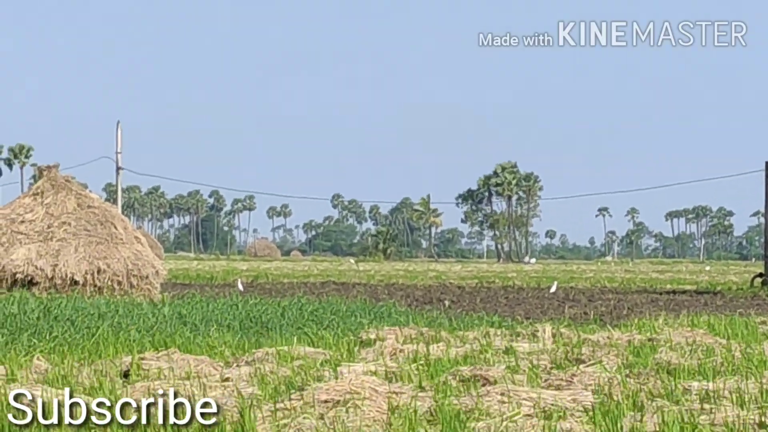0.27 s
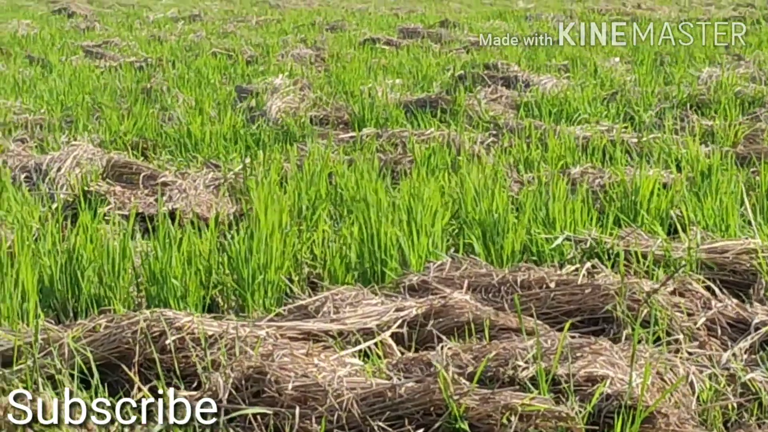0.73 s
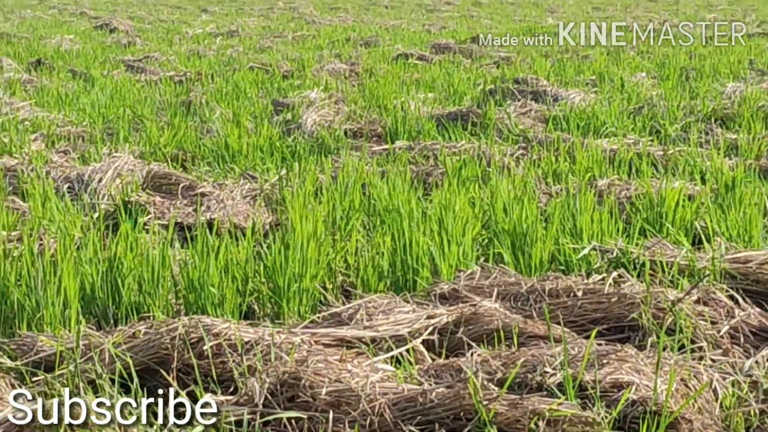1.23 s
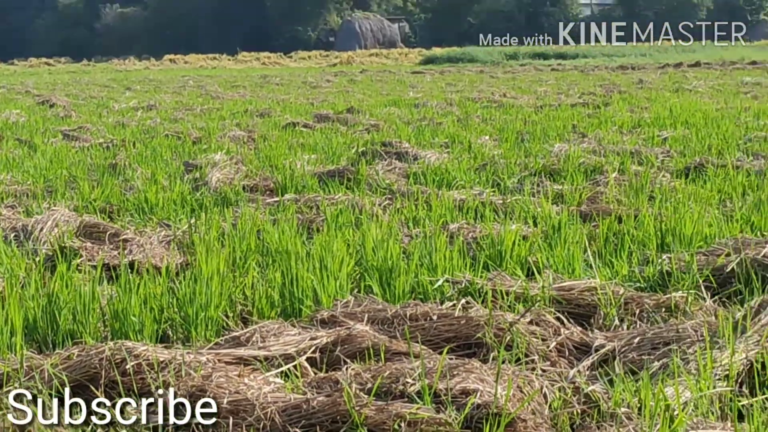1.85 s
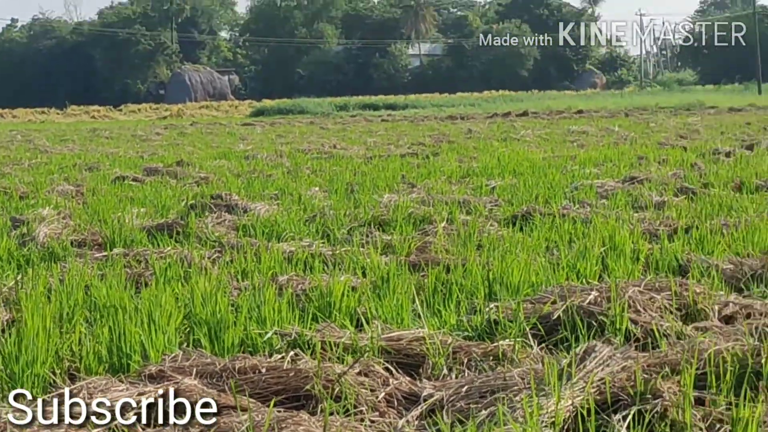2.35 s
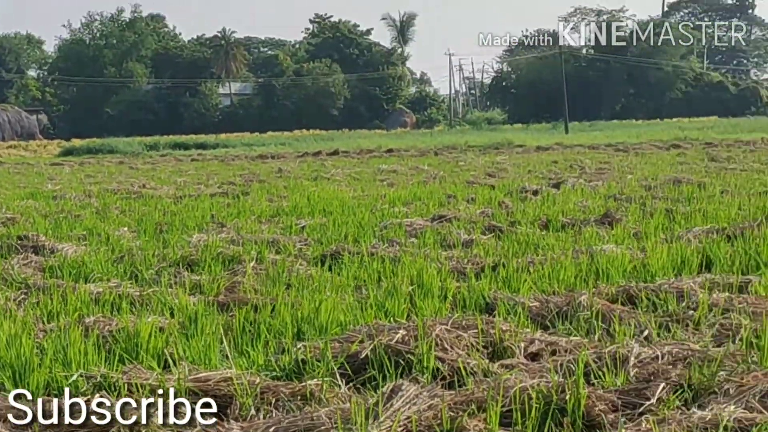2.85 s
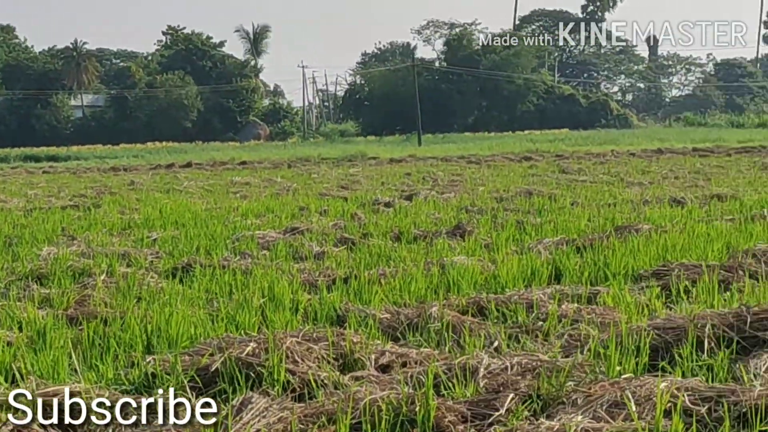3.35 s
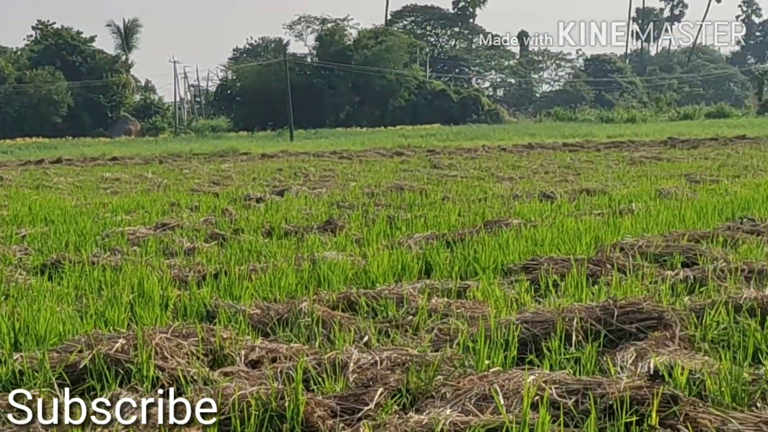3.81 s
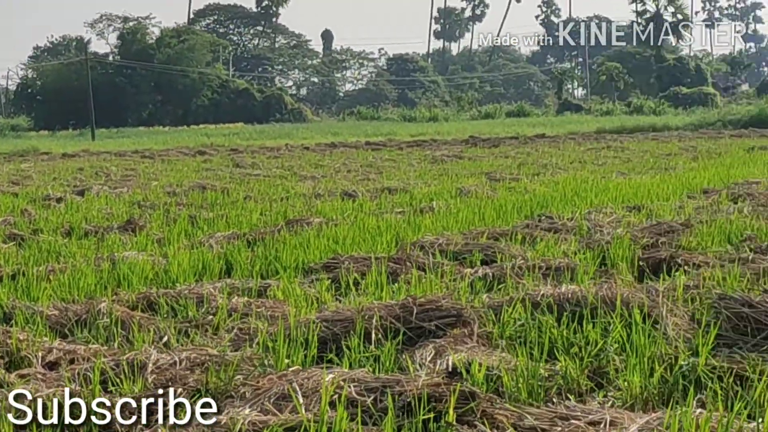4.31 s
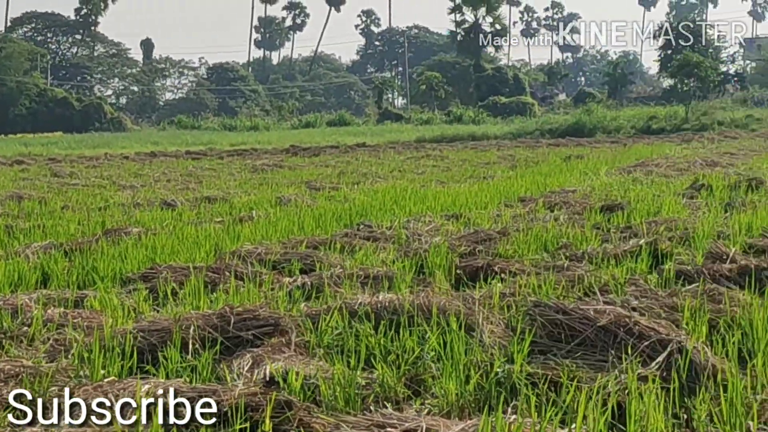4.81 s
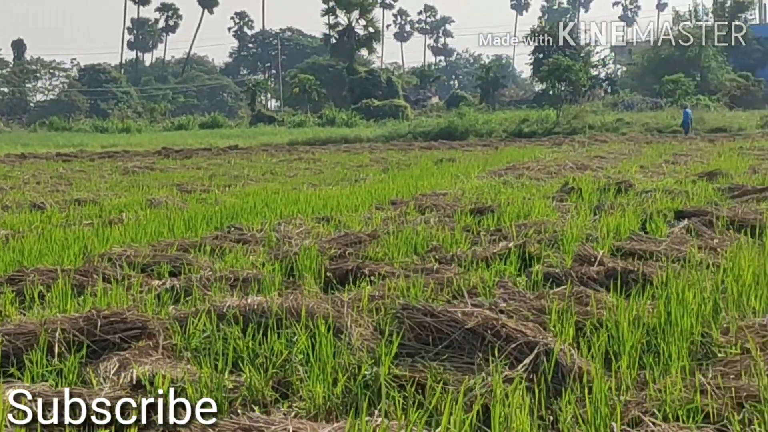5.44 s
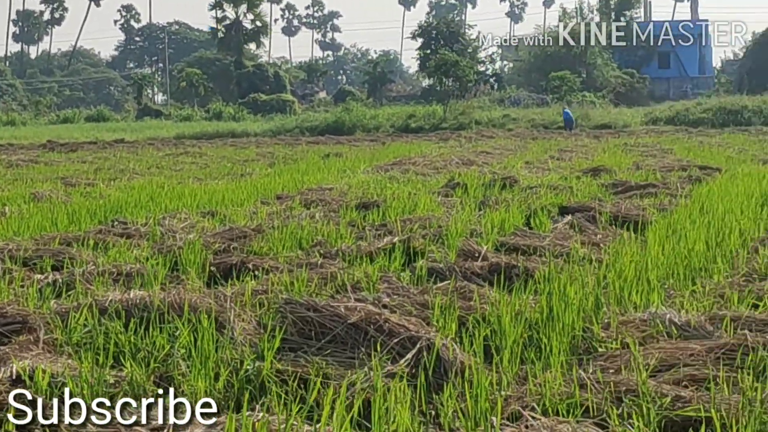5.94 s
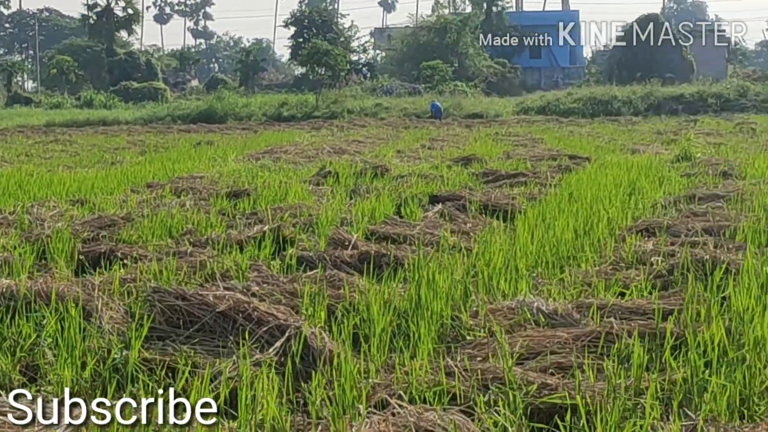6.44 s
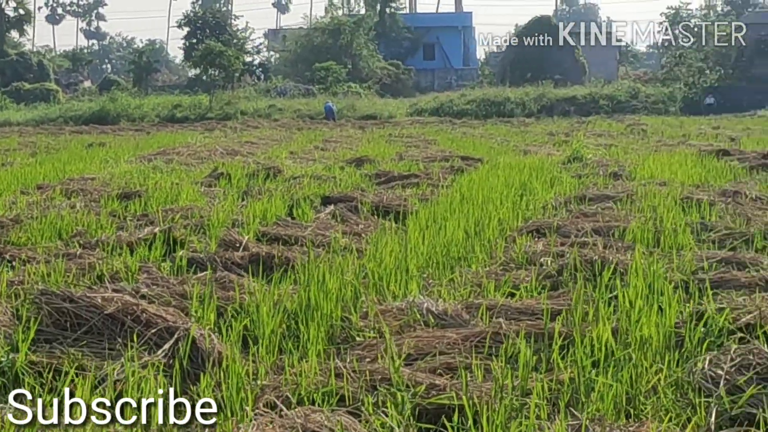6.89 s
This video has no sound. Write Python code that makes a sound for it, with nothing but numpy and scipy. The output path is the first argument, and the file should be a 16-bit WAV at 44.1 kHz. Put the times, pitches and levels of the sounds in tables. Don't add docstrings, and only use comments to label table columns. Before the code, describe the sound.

Quiet farmland outdoors: far crows and clucking hens, then raspy close caws beneath one rooster crow, followed by soft doves, chirps and a faint engine.

```python
import sys
import numpy as np
from scipy import signal
from scipy.fft import rfft, irfft, next_fast_len
from scipy.io import wavfile
from scipy.ndimage import uniform_filter1d, map_coordinates

SR = 44100
rng = np.random.default_rng(int(sys.argv[2]) if len(sys.argv) > 2 else 0)


def makeup_ratio(level_db):
    decades = np.asarray(level_db, float) / 20
    return 10 ** decades


def int16_out(signal):
    q = np.round(np.clip(np.atleast_2d(signal).T, -1, 1) * 32767)
    wavfile.write(sys.argv[1], SR, q.astype(np.int16))


N = 315756


def unit(x):
    return x / np.sqrt(np.mean(x ** 2) + 1e-20)


def along(points, hz):
    f, v = np.transpose(points)
    return np.interp(np.log(hz + 1), np.log(f + 1), v)


def sampled(rows):
    s, *cols = np.transpose(rows)
    t = np.arange(max(s[0], 0), s[-1], 1 / SR)
    return [t] + [np.interp(t, s, c) for c in cols]


def wobble(size, rate):
    knots = rng.standard_normal(int(size * rate / SR) + 4)
    return map_coordinates(knots, [np.arange(size) * rate / SR])


def panned(pan_db):
    return makeup_ratio(np.array([[pan_db], [-pan_db]]) / 2)


def add(out, s, x, pan_db, fade=0.0016):
    i = np.arange(len(x))
    x = x * np.sin(np.pi / 2 * np.clip(np.minimum(i, i[::-1]) / (fade * SR), 0, 1)) ** 2
    room = out[:, round(s * SR):][:, :len(x)]
    room += panned(pan_db) * x[:room.shape[1]]


def coloured(x, spectrum):
    m = next_fast_len(x.shape[-1] + 4096)
    gain = makeup_ratio(along(spectrum, np.fft.rfftfreq(m, 1 / SR)))
    return irfft(rfft(x, m) * gain, m)[..., :x.shape[-1]]


def rooster():
    # t/s, f/Hz, level/dB, beak closure/dB, third partial/dB
    syllables = [
        [(2.9, 743, -51, 7, -15), (2.925, 793, -32.5, -11, -24), (2.968, 789, -33.5, -6, -29),
         (2.985, 780, -63, -7, -23), (3.03, 802, -50, 3, 2)],
        [(3.1, 794, -41.5, 3, -11), (3.16, 818, -43, -6, -25), (3.19, 833, -35.5, -7, -29),
         (3.23, 782, -42.5, -10, -17), (3.33, 738, -42.5, 0, -13)],
        [(3.355, 755.5, -69, -20, -20), (3.38, 769.4, -36.5, -21, -21), (3.51, 767, -41.5, -12.5, -23),
         (3.61, 784.7, -38, -16.5, -28), (3.7, 732.6, -36, -25, -26), (3.74, 723, -43.5, -10, -6),
         (3.79, 734, -40.5, -13, -31), (3.86, 677, -39.5, -5, -26), (3.94, 725, -61, -13, -9)],
        [(3.955, 740, -46, -10, -7), (3.975, 745, -45, -37, -23), (4.1, 740, -42.5, -19, -16),
         (4.17, 732, -43, -11, -16), (4.19, 750, -84, 12, 11)],
        [(4.2, 738, -72, 21, 13), (4.235, 730, -54, 1.5, 0), (4.27, 720.5, -43, -8, -3.5),
         (4.31, 715, -49.5, -8, -10), (4.345, 680, -53.5, 12.5, 0), (4.37, 540, -56, 3, -3),
         (4.4, 588, -64, 17.5, -8)],
    ]
    # t/s, hoarseness (0-1)
    hoarseness = [(2.9, .08), (3.05, .1), (3.12, .45), (3.33, .45), (3.4, .08), (3.6, .1), (3.65, .5),
                  (3.82, .35), (3.95, .03), (4.4, .06)]
    out = np.zeros((2, N))
    for syllable in syllables:
        t, hz, db, closure_db, third_db = sampled(syllable)
        hoarse = np.interp(t, *np.transpose(hoarseness))
        turns = np.cumsum(hz * (1 + 0.062 * hoarse * wobble(len(t), 124.3))) / SR
        voice = np.zeros(len(t))
        for k, share_db in enumerate((closure_db, 0, third_db), start=1):
            voice += makeup_ratio(db + share_db + 1.5) * np.sin(2 * np.pi * k * turns)
        shake = makeup_ratio(7.0 * hoarse * wobble(len(t), 63.6))
        add(out, t[0], voice * shake, pan_db=-1.0)
    return out


def flapping(size, rattle, rattle_hz, uneven):
    flap = np.cumsum(rattle_hz * (1 + uneven * wobble(size, 68.3))) / SR
    chop = np.exp(0.76 * rattle * (np.cos(2 * np.pi * flap) + uneven * wobble(size, 263.3)))
    return chop / np.sqrt(np.abs(uniform_filter1d(chop ** 2, size=1500)))


def overtones(pitch_hz, throat, jitter, count=6):
    turns = np.cumsum(pitch_hz * (1 + jitter * wobble(len(pitch_hz), 151.8))) / SR
    k = np.arange(1, count + 1)[:, None]
    return (makeup_ratio(along(throat, k * pitch_hz)) * np.sin(2 * np.pi * k * turns)).sum(0)


def rasp(size, throat, rattle_hz):
    puffs = rng.standard_normal(size) * flapping(size, 0.52, rattle_hz, 0.327)
    return unit(coloured(puffs, throat))


def near_crow():
    # t/s, length/s, top f/Hz, tone level/dB
    caws = [
        (2.567, 0.18, 670, -43),
        (2.886, 0.18, 639, -44.5),
        (3.066, 0.37, 654.4, -44.5),
        (3.605, 0.3, 615, -50),
        (3.918, 0.06, 684, -47),
    ]
    breath_db = [-42.5, -41, -40, -43.5, -41]
    slack_hz = [534.5, 590, 589.5, 602.4, 590]
    # f/Hz, level/dB
    tone_throat = [(450, -14), (640, 2), (1000, -2), (1140, 3), (1230, -14), (1700, -16), (2000, -26),
                   (9000, -62)]
    # f/Hz, level/dB
    breath_throat = [(480, -38), (650, 2.5), (880, -7.5), (1050, -1), (1200, -8.5), (1330, 4), (1500, 5.5),
                     (1850, -7.5), (2650, -19.5), (2900, -23.5), (5200, -24), (6200, -17), (7200, -36),
                     (9500, -59)]
    rise_s, fall_s = 0.0596, 0.061
    slack_rattle, tense_rattle = 0.26, 0.62
    break_db, rasp_grows_db = 2, 27
    out = np.zeros((2, N))
    for (s, length, hz, tone_db), rasp_db, rest_hz in zip(caws, breath_db, slack_hz):
        t = np.arange(round(length * SR)) / SR
        effort = np.clip(np.minimum(t / rise_s, (length - t) / fall_s), 0, 1)
        rattle = slack_rattle + (tense_rattle - slack_rattle) * effort
        held_hz = hz * (1 + 0.025 * wobble(len(t), 14.05))
        tone = overtones(rest_hz + (held_hz - rest_hz) * effort, tone_throat, 0.024 * rattle)
        tone = tone * flapping(len(t), 0.9 * np.abs(rattle), 85.8, 0.337)
        tone = tone * makeup_ratio(tone_db - break_db * effort + 3.7 * wobble(len(t), 13.8))
        hoarse = makeup_ratio(rasp_db - rasp_grows_db * (1 - effort)) * rasp(len(t), breath_throat, 73.1)
        add(out, s, tone + hoarse, pan_db=1.0)
    return out


def answering_crow():
    # t/s, f/Hz, level/dB
    caw = [
        (5.635, 490, -60),
        (5.66, 505, -53),
        (5.735, 546, -52),
        (5.79, 513, -51),
        (5.85, 486, -51),
        (5.91, 460, -50),
        (5.98, 430, -50),
        (5.995, 425, -62),
    ]
    # f/Hz, level/dB
    throat = [(500, -17), (850, -19), (1050, -2), (1180, 0), (1300, 1.5), (1620, 4.5), (1800, -21),
              (2300, -14), (3300, -32)]
    out = np.zeros((2, N))
    t, hz, db = sampled(caw)
    cycles_per_flap = 5.3
    flap = 2 * np.pi * np.cumsum(hz * (1 + 0.0079 * wobble(len(t), 22))) / SR / cycles_per_flap
    tone = overtones(hz * (1 + 0.075 * np.cos(flap)), throat, 0.0031)
    tone = tone * (1 + 0.21 * np.cos(flap))
    add(out, t[0], makeup_ratio(db + 1.5) * tone, pan_db=-5.0)
    return out


def distant_caws(caws, throat, rattle_hz, uneven, rasp_db, pan_db):
    out = np.zeros((2, N))
    for s, length, hz, fall, db in caws:
        u = np.linspace(0, 1, round(length * SR))
        rise = 0.0672 * np.clip(1 - u / 0.287, 0, 1) ** 2
        sag = fall * np.clip((u - 0.28) / 0.72, 0, 1) ** 2
        arch = 1 - rise - sag
        tone = overtones(hz * arch, throat, 0.039 * uneven)
        tone = tone * flapping(len(u), 0.9, rattle_hz * arch, uneven)
        breath = makeup_ratio(rasp_db) * rasp(len(u), throat, rattle_hz)
        add(out, s, makeup_ratio(db) * (tone + breath), pan_db, fade=0.01)
    return out


def far_crows():
    # t/s, length/s, top f/Hz, final fall (0-1), level/dB
    raspy_caws = [
        (.75, 0.25, 482.7, 0.13, -55),
        (1.52, 0.24, 488.3, 0.06, -54.5),
        (3.92, .07, 600, 0, -60),
        (5.08, 0.21, 547, 0, -58.5),
        (6.25, .3, 570, .05, -61),
    ]
    # f/Hz, level/dB
    raspy_throat = [(500, -15), (900, -4.5), (1150, -16), (1430, -3.5), (1700, -6), (1900, 0.5),
                    (2100, 0.5), (2400, -7.5), (2900, -28), (5000, -59)]
    # t/s, length/s, top f/Hz, final fall
    # (0-1), level/dB
    tonal_caws = [(1.07, 0.17, 576, 0.054, -60), (2.04, 0.31, 548.6, 0.11, -56), (2.84, 0.069, 532, 0, -51),
                  (3.04, 0.055, 560, 0, -48), (3.38, 0.13, 527, 0.09, -49), (3.57, 0.11, 578, 0.057, -51.5),
                  (3.84, 0.19, 570, 0.087, -51), (4.46, 0.3, 545.7, 0.28, -52.5),
                  (4.66, 0.36, 566, 0.29, -62), (5.01, 0.33, 529, 0.15, -50.5),
                  (6.25, 0.35, 590, 0.29, -66)]
    # f/Hz, level/dB
    tonal_throat = [(400, -29), (550, -52), (1050, -3.5), (1280, 3.5), (1650, -6.5), (1950, -26.5),
                    (3000, -22), (5000, -34)]
    raspy = distant_caws(raspy_caws, raspy_throat, 90.5, uneven=0.3, rasp_db=-1.5, pan_db=1.5)
    tonal = distant_caws(tonal_caws, tonal_throat, 94, uneven=0.05, rasp_db=-18, pan_db=-1.5)
    return raspy + tonal


def gliding(notes, waver_db, tremble, pan_db, fade):
    out = np.zeros((2, N))
    for s, length, *ends_hz, db in notes:
        hz = np.geomspace(ends_hz[0], ends_hz[-1], round(length * SR))
        hz = hz * (1 + tremble * wobble(len(hz), 175.3))
        strength = makeup_ratio(db + waver_db * wobble(len(hz), 38.8))
        add(out, s, strength * np.sin(2 * np.pi * np.cumsum(hz) / SR), pan_db, fade)
    return out


def small_birds():
    # t/s, length/s, first f/Hz, last f/Hz, level/dB
    chirps = [(1.69, 0.029, 3600, 3140, -60), (1.72, 0.067, 4600, 3030, -59),
              (1.94, 0.019, 3550, 3140, -56), (1.98, 0.033, 4350, 3220, -55.5),
              (2.215, 0.025, 3600, 3020, -58), (2.24, 0.055, 4640, 3360, -54.5),
              (3.565, 0.021, 4250, 3920, -58), (3.76, 0.034, 3100, 2730, -55),
              (3.87, 0.041, 4540, 4340, -57), (3.96, 0.044, 3800, 3360, -59.5),
              (4.01, .035, 4370, 4050, -58), (4.9, 0.04, 3700, 2950, -59), (4.922, 0.05, 4700, 4000, -57),
              (4.94, .025, 4500, 4150, -59), (4.95, .03, 6500, 5750, -63), (5.14, 0.085, 5200, 3400, -59),
              (5.142, 0.062, 2750, 1980, -60), (5.165, .03, 4900, 4300, -58),
              (5.18, 0.038, 6600, 5650, -60), (6.965, 0.059, 3600, 1943, -53.5),
              (7.0, 0.042, 4370, 3940, -57)]
    # t/s, length/s, f/Hz, level/dB
    whistles = [(.25, 0.1, 4740, -53), (.4, 0.12, 2970, -58.5), (.62, 0.31, 4620, -69),
                (1.9, 0.14, 1256, -63.5), (2.83, 0.052, 2150, -53.5), (4.5, 0.82, 3740, -69.5),
                (5.04, 0.44, 3740, -60), (5.04, 0.055, 3430, -60), (5.12, 0.15, 3450, -59),
                (5.42, 0.035, 1476, -48), (5.69, 0.22, 2967, -61), (5.75, 0.16, 3250, -63),
                (6.05, 0.23, 2889, -58), (6.33, 0.32, 2880, -63.5), (6.95, 0.17, 2856, -59)]
    falling = gliding(chirps, 3.5, tremble=0.025, pan_db=8, fade=0.0072)
    held = gliding(whistles, 4, tremble=0.007, pan_db=2.5, fade=0.022)
    return falling + held


def doves():
    # t/s, length/s, first f/Hz, last f/Hz, level/dB
    coos = [
        (4.74, 0.26, 690, 786, -61),
        (5.325, 0.09, 813, 749, -50),
        (5.5, 0.29, 736, 718, -60),
        (6.04, 0.177, 727, 720, -63),
        (6.11, 0.19, 990, 876, -61),
        (6.35, 0.122, 415, 420, -59.5),
        (6.37, 0.091, 480, 472, -60.5),
    ]
    return gliding(coos, 3.5, tremble=0.006, pan_db=-5, fade=0.012)


def hens():
    # t/s, length/s, first f/Hz, last f/Hz, level/dB
    clucks = [(.85, 0.41, 870, 799, -61.5), (1.495, 0.041, 850, 703, -53), (1.64, 0.03, 700, 680, -53),
              (1.67, .055, 840, 844, -48), (1.72, 0.048, 920, 844, -53), (1.76, .06, 914, 866, -50),
              (1.86, 0.027, 716, 705, -51), (1.9, .055, 700, 723, -59), (2.145, .035, 850, 860, -56),
              (2.195, 0.031, 850, 810, -52), (2.24, .16, 730, 800, -60)]
    return gliding(clucks, 2.5, tremble=0.025, pan_db=-1.5, fade=0.0072)


def snaps(hits, t60, colour):
    out, t = np.zeros((2, N)), np.arange(SR // 20) / SR
    for s, db, hz, pan_db in hits:
        crack = unit(coloured(rng.standard_normal(len(t)), colour))
        ring = np.sin(2 * np.pi * hz * t) / 2
        add(out, s, makeup_ratio(db - 60 * t / t60) * (ring + crack), pan_db, fade=0.00029)
    return out


def straw():
    # t/s, peak level/dB, ring f/Hz, left-right/dB
    ticks = [
        (1.7615, -40, 9150, 1),
        (2.7015, -38, 8700, 12),
        (2.7735, -52, 12900, 4),
        (2.789, -32.5, 8950, 6),
        (2.7932, -29, 8200, 17.5),
        (3.09, -31, 5200, 7),
        (3.135, -35, 6900, 7),
        (3.25, -34, 9800, 9),
        (6.458, -36, 12000, -4),
        (6.64, -38, 12000, 4),
    ]
    # t/s, peak level/dB, ring f/Hz, left-right/dB
    taps = [
        (.264, -47.5, 400, 20),
        (4.635, -39, 503, 2),
        (5.556, -34.5, 950, -2),
        (6.977, -39, 1260, 3),
    ]
    sharp = snaps(ticks, 0.004, [(4000, -5), (8000, 22), (10500, 2), (15000, 7.5)])
    dull = snaps(taps, 0.014, [(250, -9), (900, 10), (2500, -21), (6000, -27)])
    return sharp + dull


def gusts():
    # t/s, peak level/dB, left-right/dB, f/Hz
    slaps = [
        (0.165, -29, 28, 39),
        (0.579, -34, -22, 33),
        (2.823, -37, -12, 44.5),
        (4.647, -33, 5, 41),
        (5.694, -37, -20, 28.7),
        (5.94, -31, -15, 20),
        (6.261, -32.5, -23, 37.3),
        (6.902, -36, -19, 37),
    ]
    out, t = np.zeros((2, N)), np.arange(-SR // 20, SR // 20) / SR
    for s, db, pan_db, hz in slaps:
        u = (np.pi * hz * t) ** 2
        add(out, s + t[0], makeup_ratio(db) * (1 - 2 * u) * np.exp(-u), pan_db)
    return out


def crickets():
    # wing f/Hz, strokes (/s), chirps (/s), level/dB, left-right/dB
    singers = [
        (7870, 180, 6.4, -5, 12),
        (7150, 100, 5.6, -14.5, 23),
        (8200, 68, 7.6, -7, 13.5),
    ]
    # t/s, level/dB
    chorus = [(0, -54.5), (1.56, -52.5), (2.4, -55), (3.3, -53), (4.35, -55), (5.3, -56), (5.72, -65.5),
              (6.12, -64), (7.16, -56)]
    out, t = np.zeros((2, N)), np.arange(N) / SR
    for hz, strokes, chirps, db, pan_db in singers:
        wing = wobble(N, 500) * np.sin(2 * np.pi * hz * t) + wobble(N, 500) * np.cos(2 * np.pi * hz * t)
        stroke_turns = np.cumsum(strokes * (1 + 0.036 * wobble(N, 4.4))) / SR
        stroke = np.exp(0.41 * np.cos(2 * np.pi * stroke_turns))
        chirp_turns = np.cumsum(chirps * (1 + 0.073 * wobble(N, 1.635))) / SR
        chirp = 1 / (1 + np.exp(-3 * np.cos(2 * np.pi * chirp_turns) - 1.5))
        sides = np.array([wing, np.roll(wing, N // 3)])
        out += makeup_ratio(db + 0.94 * wobble(N, 1.0)) * panned(pan_db) * unit(sides * stroke * chirp)
    return makeup_ratio(np.interp(t, *np.transpose(chorus)) - 5) * out


def rush(spectrum, alike, patchy_db):
    # f/Hz, left-right/dB
    port_lean = [(60, -1.5), (150, 0), (380, 1.5), (950, -3), (2380, 1.5), (5980, 6), (15000, 0.5)]
    z = signal.stft(rng.standard_normal((2, N + 9000)), nperseg=512)[2]
    patches = uniform_filter1d(rng.standard_normal(z.shape[1:]), size=6, axis=0)
    patches = uniform_filter1d(patches, size=14, axis=1)
    pair = signal.istft(z * makeup_ratio(patchy_db * unit(patches)), nperseg=512)[1]
    hz = np.fft.rfftfreq(pair.shape[1], 1 / SR)
    turn = np.arccos(np.clip(along(alike, hz), -1, 1)) / 2
    mid, side = rfft(pair) * makeup_ratio(along(spectrum, hz)) * [np.cos(turn), np.sin(turn)]
    lean = makeup_ratio(along(port_lean, hz) / 2)
    return unit(irfft([(mid + side) * lean, (mid - side) / lean], pair.shape[1])[:, :N])


def wind():
    # t/s, level/dB
    strength = [(0.0, -39), (0.2, -31.5), (.3, -41.5), (.4, -37.5), (0.54, -42.5), (1.19, -50.5),
                (1.45, -43.5), (2.43, -51), (2.85, -41.5), (3.05, -52.5), (4.55, -50), (4.7, -40.5),
                (4.89, -51.5), (6.5, -40), (6.92, -39.5), (7.04, -47), (7.16, -42)]
    # f/Hz, level/dB per Hz
    buffet = [(7.1, -34), (12, 6), (22, 2.5), (35, -8), (89, -12.5), (226, -57), (300, -30.5), (390, -73),
              (660, -120)]
    wind_db = np.interp(np.arange(N) / SR, *np.transpose(strength))
    veer_db = np.outer([0.5, -0.5], 3 * wobble(N, 2.46))
    lumps = makeup_ratio(2.15 * np.array([wobble(N, 8.7), wobble(N, 8.3)]))
    return makeup_ratio(wind_db + veer_db + 4) * unit(lumps * rush(buffet, [(30, 0.29)], patchy_db=3.0))


def breeze_and_hum():
    # f/Hz, level/dB per Hz
    leaves = [(120, -32), (200, -13), (414, 0.5), (677, -4.5), (1280, -2), (1480, -11), (1740, -3.5),
              (8350, -8.5), (15500, -15)]
    # f/Hz, level/dB per Hz
    village = [(120, 7), (200, -10), (304, -13), (372, -7.5), (576, -6), (925, -1), (1190, -5.5),
               (1460, -5), (4950, -14), (6500, -12.5), (7950, -6), (9710, -16), (13000, -23), (14500, -20),
               (15600, -26.5)]
    # f/Hz, correlation (-1 to 1)
    likeness = [(60, 1), (150, 1), (380, 0.81), (950, -0.11), (2380, -0.1), (5980, -0.0067), (15000, 0.12)]
    breeze_ends_s = 0.406
    t = np.arange(N) / SR
    breeze = 1 / (1 + np.exp(np.clip((t - breeze_ends_s) / 0.0076, -30, 30)))
    hum = makeup_ratio(-48) * np.sqrt(1 - breeze) * rush(village, likeness, patchy_db=1.5)
    rustle = makeup_ratio(-49.5) * np.sqrt(breeze) * rush([(100, -29)] + leaves, likeness, patchy_db=1.5)
    return hum + rustle


def engine():
    # t/s, firings (/s), level/dB
    run_up = [
        (4.4, 28.9, -68),
        (5.2, 29.9, -63),
        (6.16, 31, -61),
        (6.94, 32.1, -60.5),
        (7.16, 32.5, -60),
    ]
    # order (multiple of firing rate), level/dB
    orders = [(3, -7), (4, -3.5), (5, -1.5), (6, 3.5), (9, -7.5), (13, -9), (14, -8)]
    t, hz, db = sampled(run_up)
    turns = np.cumsum(hz) / SR
    hum = np.zeros(len(t))
    for k, share_db in orders:
        strength = makeup_ratio(db + 0.5 + share_db + 1.7 * wobble(len(t), 4.11))
        hum += strength * np.sin(2 * np.pi * round(k) * turns)
    out = np.zeros((2, N))
    add(out, t[0], hum, pan_db=-1.5, fade=0.21)
    return out


def drone():
    # f/Hz, level/dB per Hz
    rumble = [(21, -56), (35, -4.5), (56, 3.5), (80, -10.5), (145, -8), (216, -18.5), (292, -21.5),
              (317, -19.5), (420, -26.5), (550, -26), (920, -120)]
    nearing_db = 0.5 * np.arange(N) / SR
    level_db = -53 + nearing_db + 0.99 * wobble(N, 1.67)
    return makeup_ratio(level_db) * rush(rumble, [(50, 1.0), (200, 0.94)], patchy_db=0.0)


def echoes(x):
    # f/Hz, t60/s
    decay = [(300, 0.1), (1500, 0.97), (6000, 0.1)]
    # f/Hz, side to mid ratio
    spread = [(700, 0.56), (1500, 1.37), (3000, 1.53)]
    hz, t, z = signal.stft(rng.standard_normal((2, SR // 2)), SR, nperseg=256)
    z = z * makeup_ratio(-60 * t / along(decay, hz)[:, None])
    apart = along(spread, hz)[:, None]
    tail = signal.istft(np.array([z[0] + apart * z[1], z[0] - apart * z[1]]), SR, nperseg=256)[1]
    delayed = np.pad(x.mean(0), (400, 0))[None]
    return signal.fftconvolve(delayed, tail / np.linalg.norm(tail[0]), axes=1)[:, :N]


def scene():
    cock, crow = rooster() + answering_crow(), near_crow()
    birds = far_crows() + small_birds() + doves() + hens()
    wet = echoes(makeup_ratio(-17) * cock + makeup_ratio(-6) * crow + makeup_ratio(-6) * birds)
    ground = straw() + gusts() + crickets()
    background = wind() + breeze_and_hum() + engine() + drone()
    return cock + crow + birds + wet + ground + background


def thinned(x):
    # f/Hz, level/dB against the usual level
    thresholds = [(900, -40), (1300, -14), (2000, -6), (2700, -3.2), (5400, -2.7), (6200, -5), (8500, -5.5),
                  (9700, -2.5), (15000, -2.5)]
    depth_db, soft_db = -25, 0.5
    hz, _, z = signal.stft([x[0] + x[1], x[0] - x[1]], SR, nperseg=2048)
    near = uniform_filter1d(np.abs(z) ** 2, size=7, axis=1)
    near = np.abs(uniform_filter1d(near, size=2, axis=2)) + 1e-20
    usual = np.median(near, axis=2, keepdims=True)
    over_db = 10 * np.log10(near / usual) - along(thresholds, hz)[:, None]
    shut = 1 / (1.3 + np.exp(np.clip(over_db / soft_db, -30, 30)))
    mid, side = signal.istft(z * makeup_ratio(depth_db * shut), SR, nperseg=2048)[1][:, :N] / 2
    return np.array([mid + side, mid - side])


def band_limit(x):
    return signal.sosfilt(signal.butter(12, 16590, fs=SR, output="sos"), x)


def record(dry):
    # from t/s, to t/s
    dropout = (.294, .3152)
    top_hz = 15540
    t = np.arange(N) / SR
    held = coloured(thinned(dry), [(top_hz, 0), (top_hz + 60, -80)])
    outside_s = np.maximum(dropout[0] - t, t - dropout[1])
    held = held * np.clip(outside_s / 0.0004, 0, 1)
    return band_limit(held)


dry = scene()
out = record(dry)
int16_out(out)
```